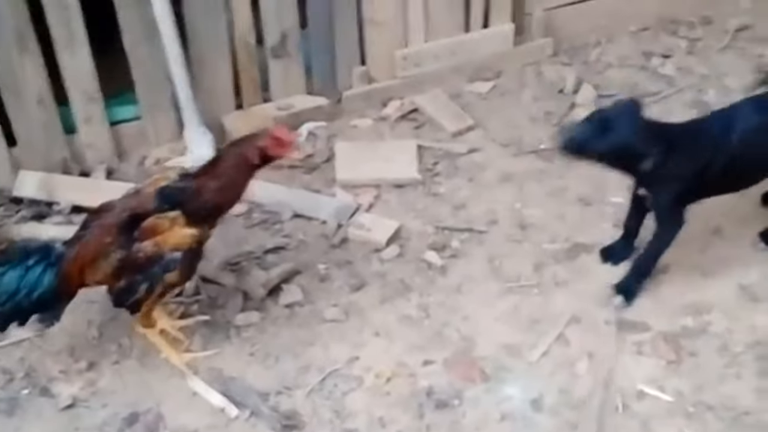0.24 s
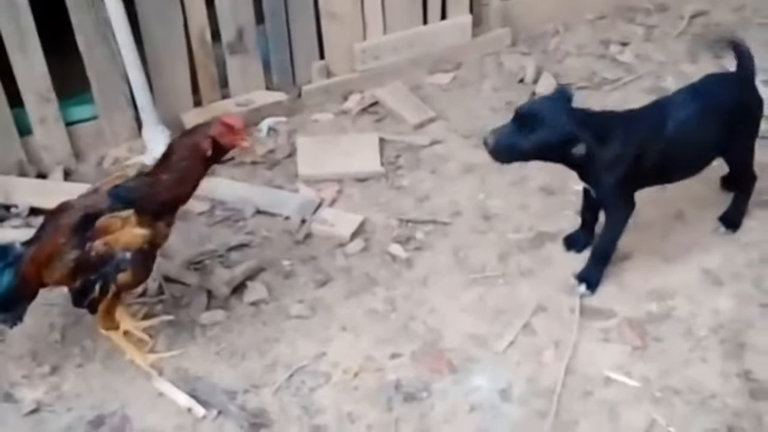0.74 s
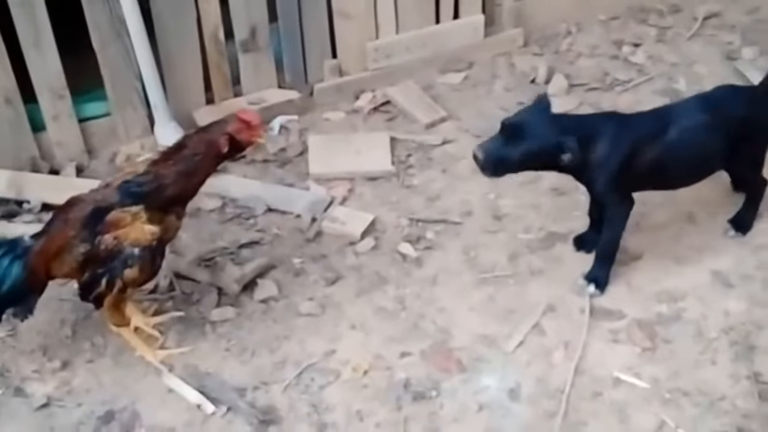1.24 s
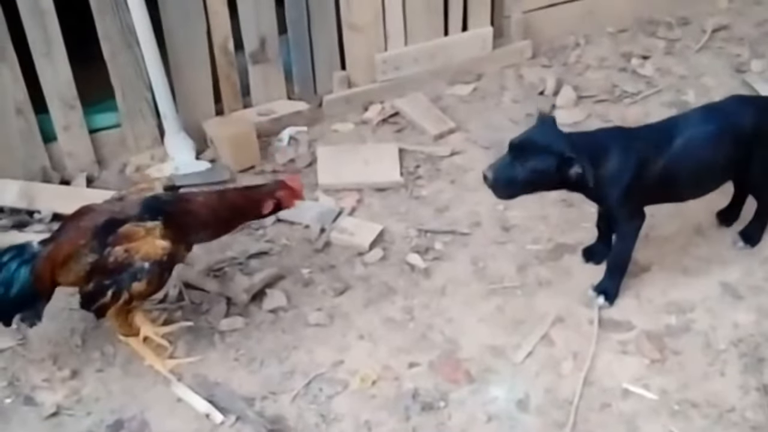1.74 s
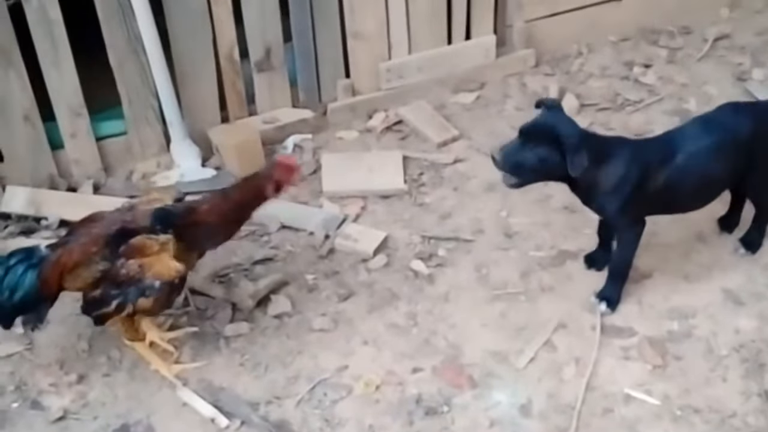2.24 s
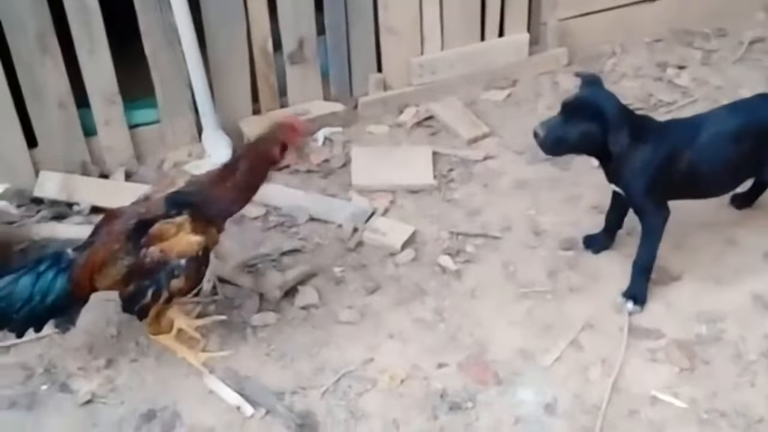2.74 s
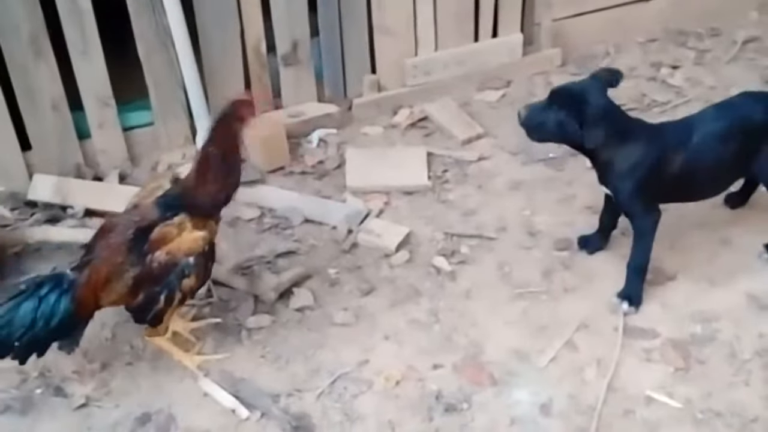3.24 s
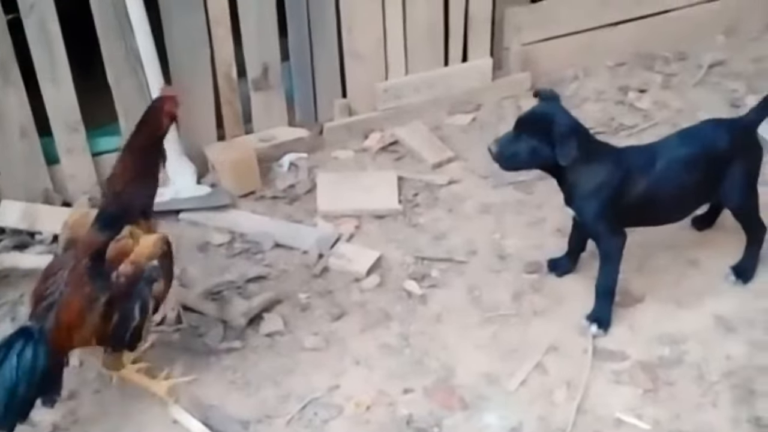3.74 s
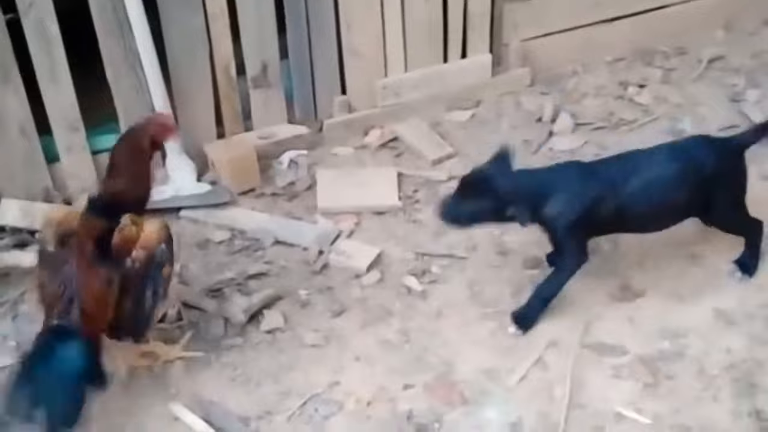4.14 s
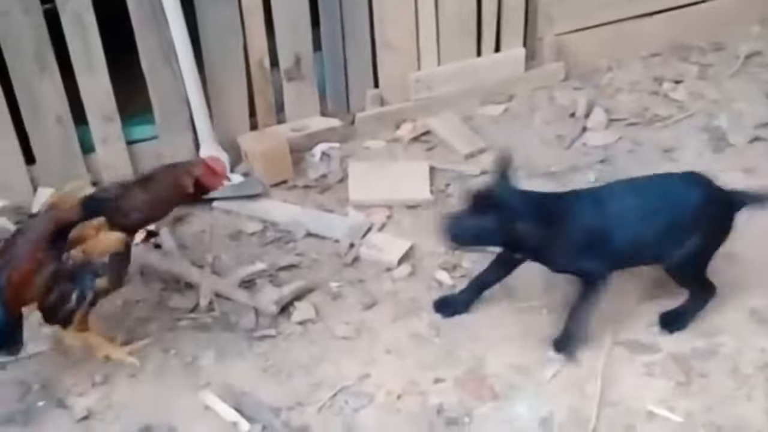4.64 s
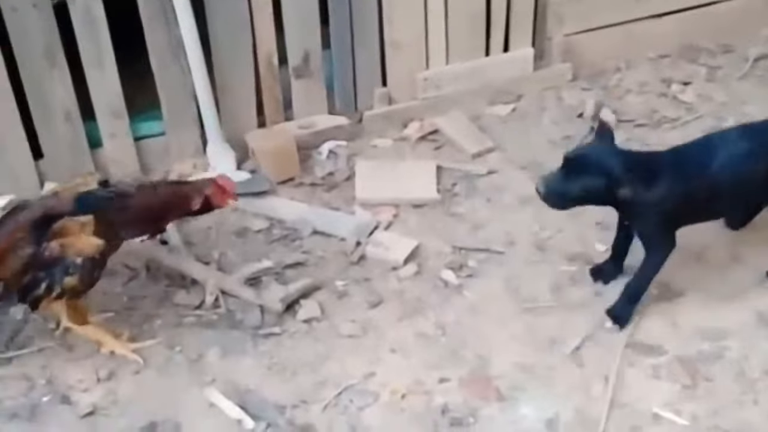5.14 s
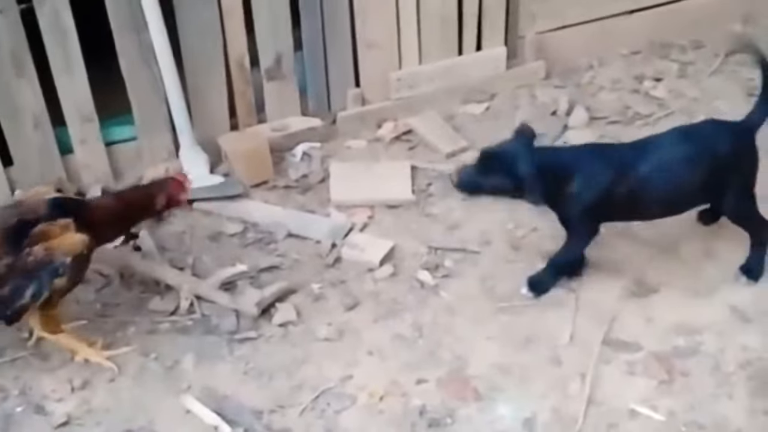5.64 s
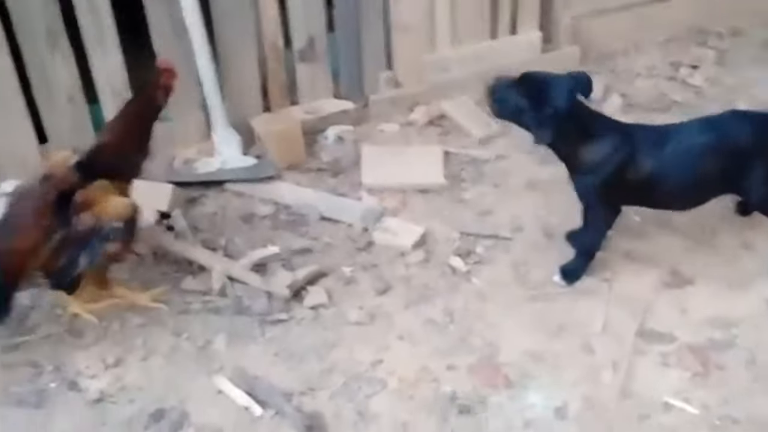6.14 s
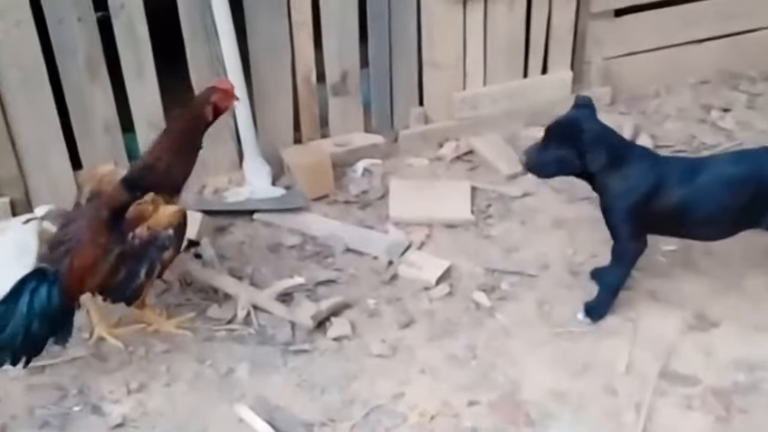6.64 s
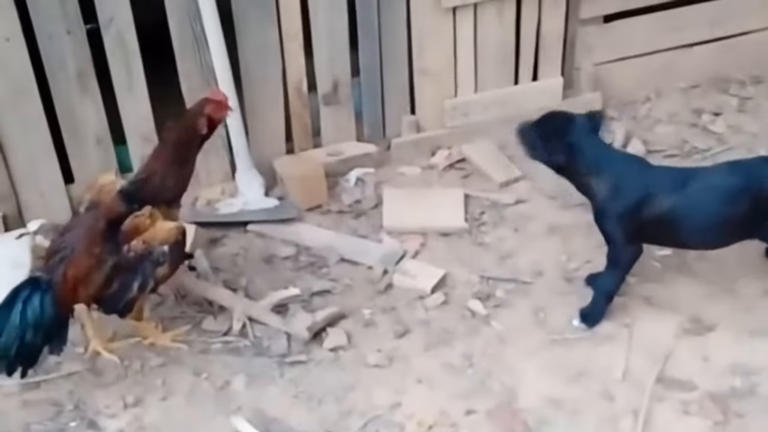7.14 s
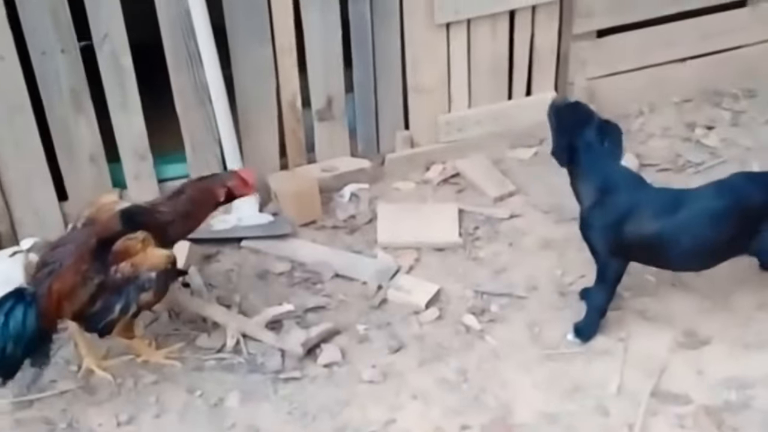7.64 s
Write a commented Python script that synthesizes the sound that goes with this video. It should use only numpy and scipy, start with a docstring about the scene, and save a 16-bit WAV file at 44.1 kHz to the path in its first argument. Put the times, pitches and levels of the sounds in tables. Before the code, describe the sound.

In a fenced dirt yard, a small puppy gives short, high, hoarse yaps close to a small microphone, each followed by a faint gasp. Hens cluck roughly around it, and a rooster crows once in four strained syllables between about 1.6 and 3.6 seconds. Afterwards clucks and squawks thicken, with dry rustling, a few snaps, short fence echo and steady hiss.

```python
"""A fenced dirt yard: a puppy yaps up close at a rooster and gasps after each yap; the rooster crows once in
four syllables while hens cluck and squawk all round. These voices are rough pulses and breath noise driven
through throat resonances. Feet and feathers rustle in dry litter as coloured noise grains, with a few snaps.
A faint low moan and clear notes of fowl, some perhaps a second voice of the rooster, are gliding tones, and
a steady hiss lies under it all."""
import sys
import numpy as np
from scipy import signal
from scipy.io import wavfile
from scipy.ndimage import uniform_filter1d

SR = 44100
rng = np.random.default_rng(int(sys.argv[2]) if len(sys.argv) > 2 else 0)


def wrap_up_sound(samples):
    """Save the sound to the file named by the first command line argument, as 16-bit audio."""
    columns = np.atleast_2d(samples).T
    # keep every value between -1 and 1, then stretch to whole-number steps
    tamed = np.clip(columns, -1, 1)
    steps = np.round(tamed * 32767).astype(np.int16)
    wavfile.write(sys.argv[1], SR, steps)


N = 347949  # length in samples


def puppy():
    """Each yap starts hoarse and bright, then clears and darkens as the pitch falls; a gasp follows."""
    # yaps: start/s, hoarse part/s, clear falling part/s, effort/dB, hoarse pitch/Hz, clear pitch/Hz,
    # end pitch/Hz, gasp level/dB
    yaps = [(0.267, .061, 0.054, -10.5, 879, 836, 658, -37),
            (0.745, 0.05, 0.076, -11, 815.4, 812, 677, -35),
            (1.218, 0.053, 0.088, -11.5, 855, 818.4, 654.5, -29),
            (1.7, .054, 0.077, -11, 924, 815, 696.5, -48), (2.369, 0.072, 0.079, -11.5, 858, 798, 722, -29),
            (2.955, 0.063, 0.049, -11.5, 866.5, 795, 657.4, -40),
            (4.145, 0.05, 0.05, -10, 899, 863, 654, -33), (4.645, 0.073, 0.06, -11.5, 815, 770, 659.5, -31),
            (5.127, .06, .055, -11, 948, 817.5, 662, -37),
            (5.554, 0.042, 0.076, -12, 895, 850, 701.5, -29.5),
            (6.329, 0.047, 0.056, -11.5, 944, 805, 687.6, -34.5),
            (7.015, 0.077, 0.046, -11, 987, 734, 727, -36.5),
            (7.508, 0.066, 0.062, -11, 886, 793, 805, -38)]
    # throat resonances before the mouth factor: f/Hz, width/Hz, level/dB
    throat = [(856, 315, -4.5), (1205, 400, -4.5), (1571, 136, -3.5), (1886, 208, -3.5), (2413, 276, -3.5),
              (2940, 265, -4.5), (3326, 250, -11.5), (4034, 1000, -22.5), (5380, 210, -26.5)]
    # level against effort/dB at: start, risen, clearing, peak, fallen, end
    yap_shape = -14.5, -4, -2, 0, -8.5, -23
    # factor on the throat frequencies at the same six moments
    mouth_shape = 0.77, 0.94, .95, 0.899, 0.83, 0.882
    rise_s, tail_s = 0.016, 0.07
    peak_share = 0.51  # the peak comes at this share of the clear part
    onset_share = 0.92  # share of the hoarse pitch at the start
    waver_db, mouth_waver = 2.5, 0.025  # effort and jaw are never quite steady
    gasp_after_s, gasp_s, gasp_hz, gasp_width_hz = 0.048, 0.091, 5240, 1400

    out = np.zeros(N)
    for start, hoarse_s, fall_s, top_db, hoarse_hz, clear_hz, end_hz, gasp_db in yaps:
        clear = start + hoarse_s
        fallen = clear + fall_s
        moments = start, start + rise_s, clear, clear + peak_share * fall_s, fallen, fallen + tail_s
        rows = np.transpose([moments, top_db + np.array(yap_shape), mouth_shape])
        t, (effort_db, mouth) = unroll(rows)
        pitches = [onset_share * hoarse_hz, hoarse_hz, clear_hz, end_hz]
        hz = np.interp(t, [start, clear - 0.012, clear, fallen], pitches)

        hoarse = 1 / (1 + np.exp((t - clear) / 0.0086))
        worn = 1 / (1 + np.exp((fallen - 0.004 - t) / 0.016))  # the folds lose step again at the end
        rough = 0.17 + 0.65 * hoarse + 0.48 * worn
        jaw_db = -8 * np.exp(-(t - t[0]) / 0.011)  # the jaw takes a moment to drop
        open_db = 2.6 * hoarse - 18 * (t - clear).clip(0) + jaw_db
        factor = mouth * (1 + mouth_waver * slow(len(t), size=500))
        sound = voice(hz, rough, throat, factor, open_db, jitter=0.13, tilt=0.37, flutter_db=6.0)

        # air past the teeth
        air_hz = 7330 + 400 * slow(len(t), size=900)
        air = evened(resonate(rng.standard_normal(len(t)), air_hz, 1800))
        air = air * gain_of(2.36 * slow(len(t), size=300)) * np.clip((t - t[0]) / 0.031, 0, 1)
        effort_db = effort_db + waver_db * rough * slow(len(t), size=300)
        add(out, t, gain_of(effort_db) * (sound + gain_of(-24.5) * air))

        t = np.arange(0, gasp_s, 1 / SR)
        drift_hz = gasp_hz * (1 + 0.25 * slow(len(t), size=1500))
        gasp = evened(resonate(rng.standard_normal(len(t)), drift_hz, gasp_width_hz))
        gasp = gasp * np.sin(np.pi * t / gasp_s)
        add(out, fallen + gasp_after_s + t, gain_of(gasp_db) * gasp)
    return out


def rooster():
    """A strained voice in a long windpipe; throbs open fast, sag and shut, most deeply in the treble."""
    # the crow, one table a syllable: t/s, effort/dB, pitch/Hz, roughness (clipped to 0-1), beak opening/dB
    crow = [
        [(1.605, -32, 683, 0.4, -2.5), (1.63, -20, 669.3, 0.22, -0.5), (1.69, -20, 653.3, 0.07, 0.5),
         (1.72, -31, 670, 0, 1)],
        [(2.113, -22, 584, 0.2, 2), (2.123, -17.5, 603, 0.54, 3.5), (2.2, -17, 593.7, 1.11, 0),
         (2.295, -18.5, 566, 0.97, 1), (2.37, -34, 536, 1.02, -6)],
        [(2.575, -27, 764, 0.79, 0), (2.62, -13.5, 786, 0.88, -1.5), (2.69, -12.5, 775.6, 0.54, 3.5),
         (2.86, -12.5, 784.3, 0.87, 1.5), (2.95, -14.5, 779, 0.97, 1), (3.02, -35, 750, .7, 1)],
        [(3.11, -19, 652, .6, -4), (3.185, -16.5, 683, .4, 1), (3.22, -16, 683, .06, 3),
         (3.28, -18, 660, .02, 2.5), (3.36, -14.5, 652, 0.05, -0.5), (3.385, -16.5, 631.4, 0.85, -1),
         (3.44, -17.5, 562, 0.64, 4.5), (3.48, -21.5, 507, 0.56, 0), (3.52, -28, 476, 0.94, -2),
         (3.56, -31, 500, 0.96, -10)],
    ]
    # windpipe resonances before each syllable's factor: f/Hz, width/Hz, level/dB
    windpipe = [(601, 53, 1), (848, 423, 1.5), (1488, 100, 1), (2140, 330, -15.5), (2440, 175, -7),
                (2940, 1800, -16.5), (3467, 68, 1), (3700, 510, -11), (4510, 84, -11.5), (5130, 470, -17),
                (5780, 100, -26), (6060, 114, -3), (6340, 50, -2.5), (6730, 420, -11.5), (7640, 410, -23),
                (8600, 460, -31.5), (9840, 710, -32), (11100, 1800, -43)]
    # per syllable: factor on the windpipe frequencies, throb depth (0-1)
    syllables = [(0.95, 0.3), (0.98, 0), (0.98, 1), (.915, 0.93)]
    # throbs per syllable: moment they settle/s (before a 4 ms lead), settled period/s,
    # hurry before that/s per throb squared
    throbs = [(1.6, .03, 0), (2.1, .03, 0), (2.7924, .0307, .0005), (3.2649, .0333, .002)]
    sets_in_s, spread_db = 0.12, 3  # time for the throb to reach full depth, chance from throb to throb

    out = np.zeros(N)
    count = np.arange(-7, 12)  # throbs numbered from the settling one
    for rows, (pipe, depth), (settled, period, hurry) in zip(crow, syllables, throbs):
        t, (effort_db, hz, rough, open_db) = unroll(rows)
        throb_s = settled - 0.004 + period * count + hurry * count.clip(max=0) ** 2
        beat = np.interp(t, throb_s, count)
        part = beat % 1  # position within a throb
        depth = np.clip(depth, 0, 1) * np.clip((t - t[0]) / sets_in_s, 0, 1)
        opening = 1 - np.exp(-part / 0.08)
        sag = 0.5 + 0.5 * np.cos(np.pi * part ** 1.35)
        shut = 1 - opening * sag
        throb_db = spread_db * rng.standard_normal(len(count))
        strength = gain_of(depth * np.interp(beat - 0.3, count, throb_db))

        sound = voice(hz, rough, windpipe, pipe, open_db, jitter=0.03, tilt=0.011, flutter_db=5.0)
        low = signal.sosfilt(signal.butter(2, 1700, fs=SR, output="sos"), sound)
        treble = (sound - low) * strength * (1 - depth * shut)
        low = low * (1 - 0.5 * depth * shut)
        add(out, t, gain_of(effort_db) * (low + treble))
    return out


def hens():
    """Short pulses and breath through each bird's windpipe; the beak shuts as the call fades."""
    # clucks and squawks: loudest moment t/s, swell/s, fade/s, effort/dB, pitch at the loudest/Hz,
    # glide from there to the end as a share of pitch, roughness (0-1), beak opening/dB,
    # factor on the windpipe frequencies (birds differ in size)
    clucks = [(0.005, 0.0056, 0.055, -29, 327, -0.029, 0.77, 2.5, 0.82),
              (0.075, 0.024, 0.048, -25.5, 256, -0.081, 0.77, -1, 0.85),
              (0.17, 0.022, 0.03, -27.5, 303, -0.0052, .5, 8.5, 0.84),
              (0.241, 0.014, 0.074, -21.5, 218.2, -0.042, 0.8, 0, 0.96),
              (0.55, 0.063, 0.044, -20.5, 250.5, -0.095, 0.75, 0.5, 0.87),
              (0.72, 0.039, 0.057, -20, 313, .14, 0.31, 1.5, 0.82),
              (0.97, .04, 0.097, -28, 303.6, -.08, 0.38, 1.5, 0.84),
              (1.05, 0.05, 0.047, -17.5, 243, -0.0072, 0.75, 0.5, 0.93),
              (1.52, 0.017, 0.017, -18.5, 340, -0.065, 0.55, -0.5, 0.94),
              (1.966, 0.038, 0.062, -20.5, 248.2, -0.029, 0.75, 1, 0.93),
              (2.08, 0.02, 0.044, -19, 240, -0.065, 0.88, -2.5, 0.99),
              (3.54, 0.039, 0.036, -17, 681, 0.071, 0.55, -2, 0.81),
              (3.69, 0.041, 0.067, -21, 358.5, 0.037, 0.7, -0.5, .84),
              (3.845, 0.021, 0.049, -22.5, 228.4, 0.038, 0.71, 2, 0.86),
              (3.89, 0.011, 0.024, -16, 693, -0.018, 0.48, -2.5, 1),
              (3.93, 0.016, 0.035, -22.5, 727, 0, 0.43, -1.5, 0.96),
              (4.04, 0.029, .03, -20.5, 366.3, -0.024, .63, 1, .94),
              (4.125, 0.033, 0.052, -28.5, 299.4, 0.018, 0.74, -2, 0.93),
              (4.255, .02, .04, -21.5, 659, 0.0095, 0.25, 0, 0.94),
              (4.3, 0.02, .03, -30, 662, 0.0065, 0.5, 5, 0.97),
              (4.369, .015, 0.13, -28, 405, 0.024, 0.7, -4, 0.94),
              (4.565, 0.023, 0.033, -33, 239, 0.056, 0.35, -8, 0.68),
              (4.92, .02, 0.072, -34.5, 378.5, -0.0058, 0.64, -5.5, 0.83),
              (5.03, 0.031, 0.046, -35.5, 350, -0.0086, .6, -10, 0.77),
              (5.09, 0.034, 0.06, -20.5, 247, -0.043, 0.69, 2.5, .9),
              (5.335, 0.037, 0.048, -27.5, 334.2, -.07, 0.73, 4, .93),
              (5.445, 0.013, 0.17, -20, 801, 0.043, 0.7, 4, 0.9),
              (5.515, 0.062, 0.11, -17.5, 839, -0.035, 0.63, 3.5, 0.93),
              (5.75, .07, 0.13, -20, 394, 0.0027, 0.86, 1, 0.83),
              (5.862, .03, 0.052, -19.5, 377.8, -0.069, 0.84, 0.5, .88),
              (5.947, 0.012, 0.062, -25.5, 365, -0.013, 0.5, -1, .88),
              (6.006, .04, 0.062, -18.5, 402.4, 0.0022, 0.78, 1, 0.92),
              (6.11, .02, 0.055, -26, 320.6, 0.0045, 0.58, 1, 0.82),
              (6.185, 0.027, 0.092, -23, 383, 0.066, 0.86, 0, 0.81),
              (6.29, 0.028, 0.052, -27.5, 224.8, 0.025, 0.74, 3.5, 0.95),
              (6.592, 0.008, 0.031, -30.5, 342, 0, 0.52, 9, 0.84),
              (6.675, 0.0071, 0.025, -23.5, 671, -0.023, 0.37, 5, 0.9),
              (6.762, 0.029, 0.036, -21, 289, -.07, 0.73, 0, 0.92),
              (6.95, 0.023, 0.041, -19, 298.4, -0.089, 0.64, 1.5, 0.93),
              (7.318, .026, 0.045, -21.5, 361, 0.09, 0.76, 0.5, 0.92),
              (7.362, 0.013, 0.02, -17, 741, -0.0078, 0.09, 1.5, 0.86),
              (7.767, 0.016, 0.066, -18, 791, -0.095, 0.54, 1, 0.88)]
    # windpipe resonances before the size factor: f/Hz, width/Hz, level/dB
    hen_pipe = [(518, 290, -13.5), (751, 318, 1), (1047, 276, 0.5), (1547, 480, -11), (2250, 465, -8),
                (3018, 390, -10), (3882, 132, -8), (4534, 330, -15), (5720, 690, -13), (6905, 500, -12),
                (7840, 440, -17), (9500, 4500, -37)]
    start_db, end_db, beak_shuts_db = -14, -21, -6  # effort at the ends of a call, beak by its end
    roundness = 1.49  # exponent that rounds the top of each call

    out = np.zeros(N)
    for top, swell_s, fade_s, db, top_hz, glide, rough, beak_db, neck in clucks:
        # place runs from -1 at the start over 0 at the loudest to 1 at the end
        t, (place,) = unroll([(max(top - swell_s, 0), -1), (top, 0), (top + fade_s, 1)])
        effort_db = db + np.where(place < 0, start_db, end_db) * abs(place) ** roundness
        open_db = beak_db + beak_shuts_db * place.clip(0)
        hz = top_hz * (1 + glide * place)
        sound = voice(hz, rough, hen_pipe, neck, open_db, jitter=0.0502, tilt=0.015, flutter_db=4.0)
        add(out, t, gain_of(effort_db) * sound)
    return out


def rustle():
    """Dense grains of dry litter and feathers, with a few single snaps of ringing noise."""
    # rustle loudness: t/s, level/dB
    loudness = [(0.0, -42), (0.5, -38), (0.77, -51), (1.0, -45), (1.53, -39.5), (1.62, -65), (1.75, -46),
                (2.12, -37), (2.36, -45), (2.5, -25.5), (2.6, -42.5), (3.15, -35.5), (3.25, -32),
                (3.36, -30), (3.45, -26.5), (3.54, -35.5), (3.6, -49), (4.24, -43.5), (4.34, -39.5),
                (4.8, -33.5), (5.0, -45), (5.49, -44), (5.67, -36), (6.57, -42.5), (6.75, -49), (7.34, -48),
                (7.7, -35), (7.89, -56)]
    # spectrum of the litter, before levelling: f/Hz, relative level per Hz/dB
    litter_tone = [(880, -66.5), (1500, -7), (2580, -9.5), (2850, -12.5), (4020, -10.5), (5310, -12.5),
                   (6660, -9), (13000, -43)]
    # snaps of twigs and grit: t/s, peak level/dB
    snaps = [(4.3127, -6.5), (4.535, -19.5), (6.823, -23), (7.6325, -21), (7.7965, -19), (7.825, -15.5),
             (7.8712, -25)]

    grain_db = 3.9 * np.minimum(rng.exponential(1, N // 40 + 1), 3)  # one level per 40 samples
    grains = rng.standard_normal(N) * gain_of(grain_db).repeat(40)[:N]
    level_db = np.interp(np.arange(N) / SR, *np.transpose(loudness))
    out = coloured(grains, litter_tone, patchy_db=4.5) * gain_of(level_db)
    t = np.arange(400) / SR
    for s, db in snaps:
        burst = rng.standard_normal(400) * gain_of(-60 * t / 0.018)
        snap = resonate(burst, 5600, 2050)
        add(out, s + t, gain_of(db) * snap / abs(snap).max())
    return out


def clear_notes():
    """Clear notes of fowl, some perhaps a second voice of the rooster: nearly pure gliding tones."""
    # notes: start t/s, length/s, first pitch/Hz, last pitch/Hz, level/dB
    notes = [(0.0, 0.18, 914, 945, -34), (0.4, 0.14, 467, 377, -37), (0.96, 0.1, 636, 634, -38),
             (1.11, .11, 685, 645, -34.5), (3.11, .09, 877, 916, -26.5), (3.19, 0.13, 749, 703, -16.5),
             (3.33, 0.055, 717, 688, -16.5), (3.4, 0.11, 499, 459, -30.5), (3.7, .12, 502, 481, -39.5),
             (6.86, 0.072, 469, 520, -44), (7.4, .1, 433, 503, -50), (7.22, .07, 735, 734, -43)]
    return hum(notes, second_db=-28)


def low_moan():
    """A faint low moan, sinking in pitch, with a stronger octave than the clear notes."""
    # moans: start t/s, length/s, first pitch/Hz, last pitch/Hz, level/dB
    moans = [(1.88, 0.24, 154, 129, -57), (4.36, 0.31, 155, 127, -58), (5.76, 0.357, 161, 128, -60)]
    return hum(moans, second_db=-11)


def yard_hiss():
    """Steady background noise with a fixed spectrum and drifting patches."""
    # spectrum of the hiss, before levelling: f/Hz, relative level per Hz/dB
    hiss_tone = [(21, -56), (35, -12.5), (191, -30.5), (479, -3), (646, -9), (714, 1.5), (1010, -7.5),
                 (1270, -13.5), (1840, -37.5), (2670, -24), (3520, -17.5), (3880, -20.5), (6390, -13),
                 (13500, -77)]
    return gain_of(-41.5) * coloured(rng.standard_normal(N), hiss_tone, patchy_db=2.8)


def yard(x):
    """Echo of fence and walls: sparse taps of random sign, each band dying at its own speed."""
    # time to die away by 60 dB: f/Hz, t60/s
    yard_t60 = [(300, 0.086), (1000, 0.16), (3000, 0.081), (9000, 0.087)]
    taps = np.zeros(SR // 2)
    at = np.arange(500, SR // 2 - 20, 20)
    taps[at + rng.integers(0, 20, len(at))] = rng.choice([-1., 1.], len(at))
    hz, t, z = signal.stft(taps, SR, nperseg=256)
    decay = gain_of(-60 * t / read(yard_t60, hz)[:, None])
    tail = signal.istft(z * decay, SR, nperseg=256)[1]
    return signal.fftconvolve(x, tail / np.linalg.norm(tail))[:N]


def voice(hz, rough, modes, factor, open_db, jitter, tilt, flutter_db):
    """Unsteady pulses and puffs of noise pass the modes of a throat; an open mouth lifts the upper modes."""
    rough = np.clip(rough, 0, 1)
    turns = np.cumsum(hz * (1 + jitter * (rough + 0.021) * slow(len(hz), size=90))) / SR
    top = int(13000 / hz.max())  # number of harmonics
    folds = evened(sum(np.cos(2 * np.pi * k * turns) / k ** tilt for k in range(1, top + 1)))
    puff_shape = 0.61 + np.exp(-(turns % 1) / 0.45)  # breath is strongest as each cycle begins
    puffs = evened(puff_shape * rng.standard_normal(len(hz)))
    out = 0
    for k, (f, w, db) in enumerate(modes):
        octaves = max(np.log2(f / 800), 0)
        breath = rough ** (1.6 / (1 + 0.4 * octaves))  # upper modes are fed more by noise
        drive = np.sqrt(1 - breath) * folds + np.sqrt(breath) * puffs
        # hoarse folds feed each mode by fits
        catch_db = flutter_db * rough * min(0.5 + octaves / 2, 1) * slow(len(hz), size=350)
        gain = gain_of(db + open_db * octaves + catch_db)
        out = out + (-1) ** k * gain * resonate(drive, f * factor, w)
    # level out the loudness, so that the caller's effort alone shapes it
    return out / np.sqrt(abs(uniform_filter1d(out ** 2, 2500)) + 1e-12)


def resonate(x, hz, width):
    """A steep resonance: shifts the curve hz down to zero, smooths twice, and shifts back."""
    turn = np.exp(2j * np.pi * np.cumsum(hz * np.ones(len(x))) / SR)
    r = np.exp(-np.pi * abs(width) / SR)
    smooth = signal.lfilter([(1 - r) ** 2], [1, -2 * r, r * r], x / turn + 1e-18)
    return 2 * (turn * smooth).real


def hum(calls, second_db):
    """A slightly wavering, gliding tone and its octave for each call, swelling in and out."""
    out = np.zeros(N)
    for start, length, first_hz, last_hz, db in calls:
        t, (hz,) = unroll([(start, first_hz), (start + length, last_hz)])
        waver = 0.11 * uniform_filter1d(rng.standard_normal(len(t)), 400)
        turns = np.cumsum(hz * (1 + waver)) / SR
        tone = np.sin(2 * np.pi * turns) + gain_of(second_db) * np.sin(4 * np.pi * turns)
        swell = signal.windows.tukey(len(t), 0.4)
        add(out, t, np.sqrt(2) * gain_of(db) * swell * tone)
    return out


def coloured(x, tone, patchy_db):
    """Gives a noise a spectrum with drifting patches, at rms 1."""
    hz, t, z = signal.stft(x, SR, nperseg=1024, noverlap=768)
    patches = uniform_filter1d(rng.standard_normal(z.shape), 12, 0)  # across frequency
    patches = evened(uniform_filter1d(patches, 10, 1))  # across time
    z = z * gain_of(read(tone, hz)[:, None] + patchy_db * patches)
    return evened(signal.istft(z, SR, nperseg=1024, noverlap=768)[1][:N])


def slow(count, size):
    """Smooth random drift of rms 1; a larger size in samples drifts more slowly."""
    return evened(uniform_filter1d(uniform_filter1d(rng.standard_normal(count), size), size))


def gain_of(db):
    """Decibels to gain."""
    return 10 ** (np.asarray(db) / 20)


def evened(x):
    """Scales to rms 1."""
    return x / np.sqrt(np.mean(x ** 2) + 1e-20)


def read(points, hz):
    """Reads a curve of (f/Hz, value) points on a log-frequency axis."""
    f, value = np.transpose(points)
    return np.interp(np.log(hz + 1), np.log(f + 1), value)


def unroll(rows):
    """Sample times of a table and its columns at those times."""
    s, *columns = np.transpose(rows)
    t = np.arange(s[0], s[-1], 1 / SR)
    return t, [np.interp(t, s, c) for c in columns]


def add(mix, t, sound):
    """Mixes a sound in at its time, with soft ends."""
    part = mix[round(t[0] * SR):][:len(sound)]
    part += (sound * signal.windows.tukey(len(sound), 0.08))[:len(part)]


def scene():
    """Dog, rooster, hens and clear notes with their echo off the yard, over rustle, moan and hiss."""
    # high voices carry nothing below their pitch
    dog = signal.sosfilt(signal.butter(6, 480, "high", fs=SR, output="sos"), puppy())
    cock = signal.sosfilt(signal.butter(6, 460, "high", fs=SR, output="sos"), rooster())
    birds = hens() + clear_notes()
    echo = yard(gain_of(-9.0) * dog + gain_of(-14.0) * birds + gain_of(-9) * cock)
    near = dog + cock + birds + echo + rustle()
    small_mic = signal.butter(3, [280, 10000], "band", fs=SR, output="sos")
    near = signal.sosfilt(small_mic, near)
    return (near + low_moan() + yard_hiss())[None]


def record(dry):
    """Soft overload that bends the loudest peaks, then the band limit."""
    edge_hz = 15746
    soft = 1.2 * np.tanh(dry / 1.2)
    lowpass = signal.firwin(511, edge_hz, window=("kaiser", 9), fs=SR)
    return signal.oaconvolve(soft, lowpass[None], "same")


dry = scene()
out = record(dry)
wrap_up_sound(out)
```